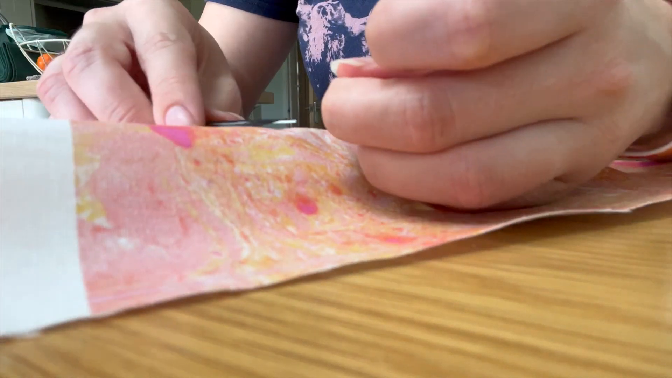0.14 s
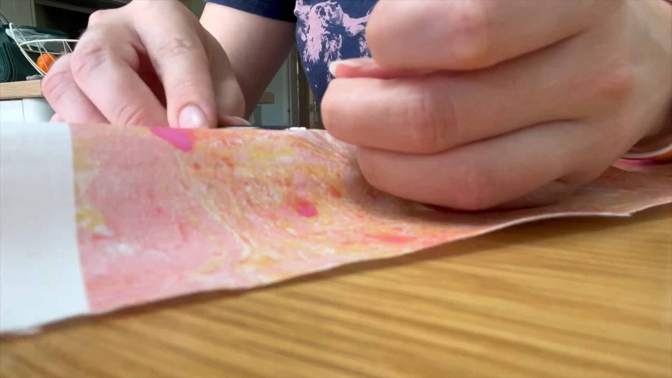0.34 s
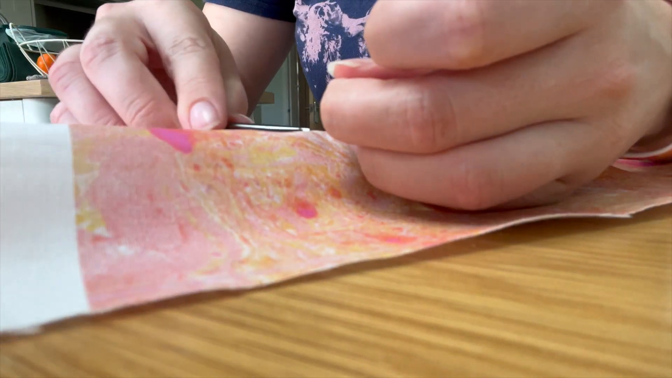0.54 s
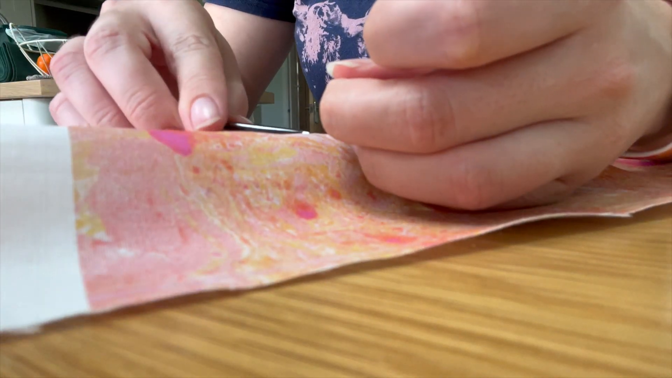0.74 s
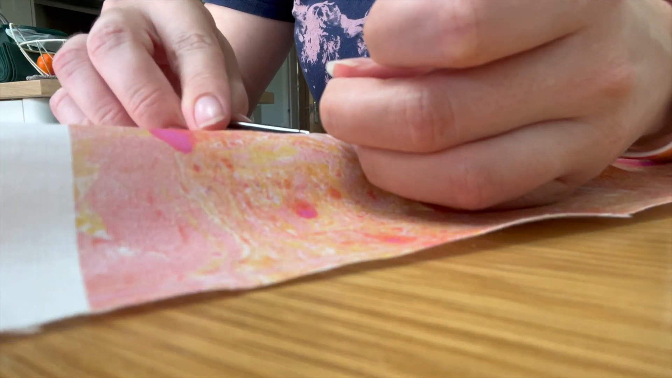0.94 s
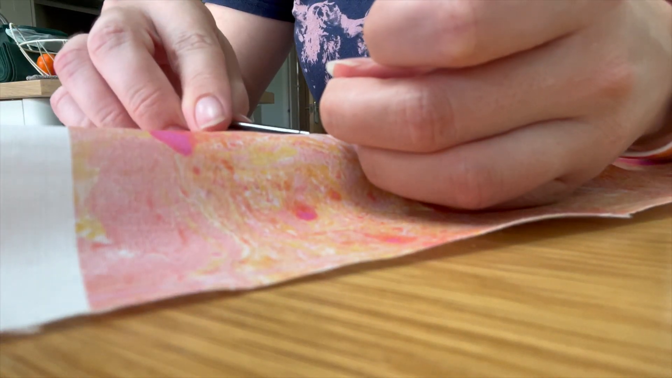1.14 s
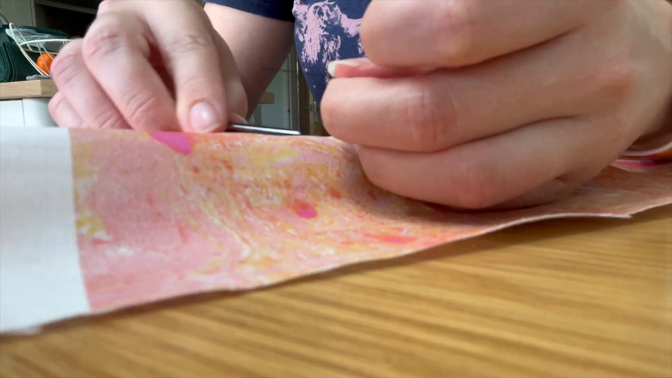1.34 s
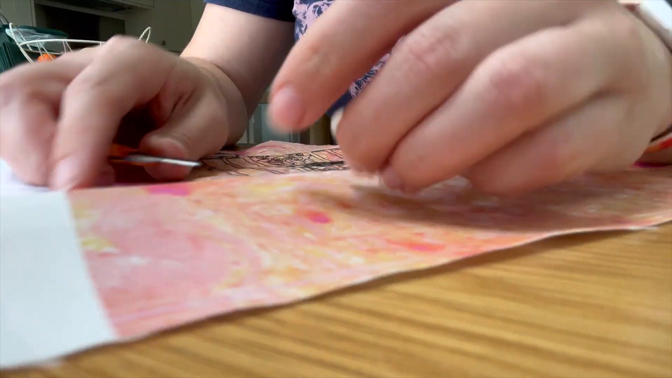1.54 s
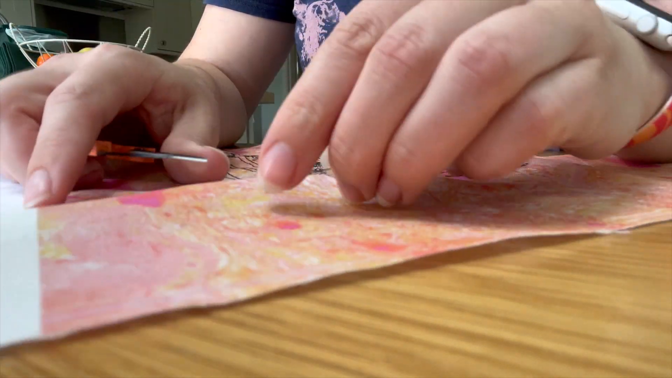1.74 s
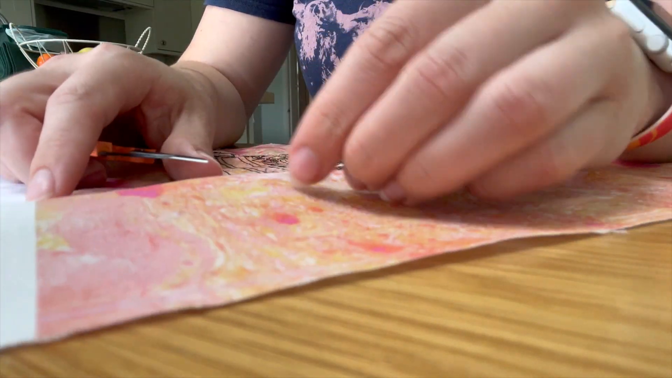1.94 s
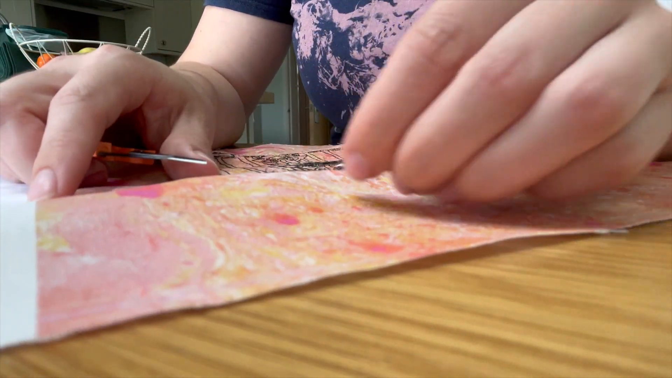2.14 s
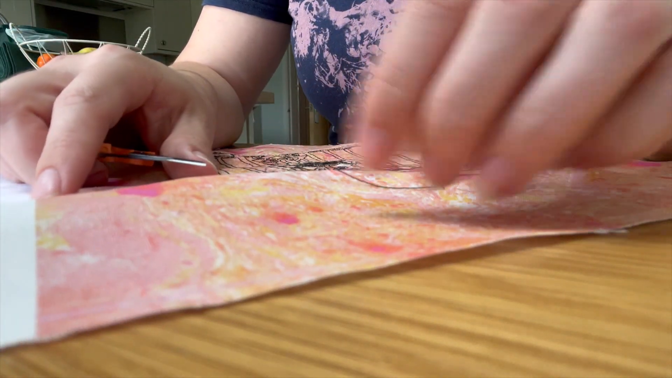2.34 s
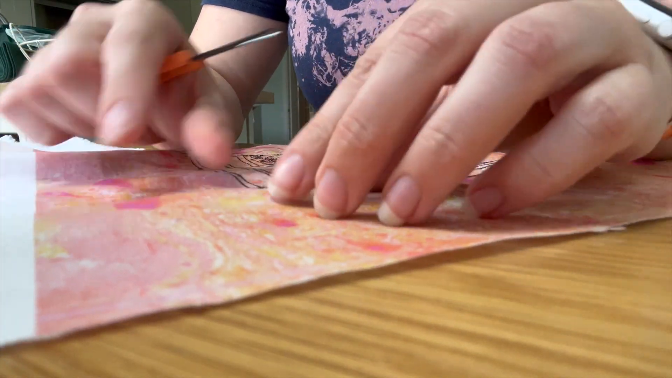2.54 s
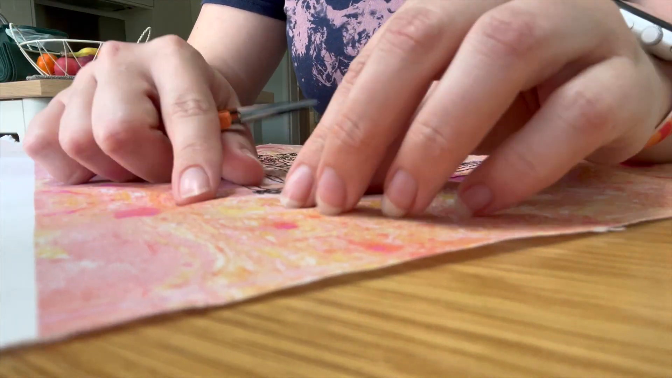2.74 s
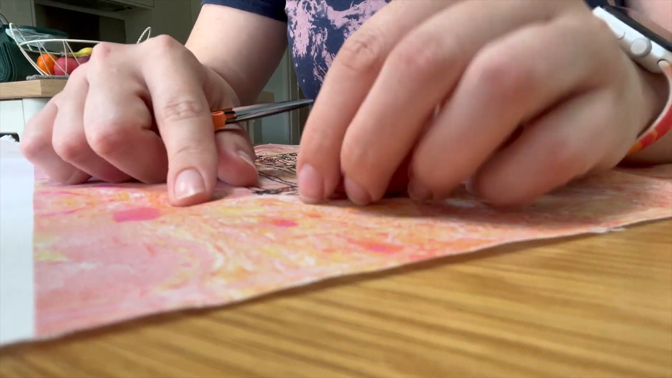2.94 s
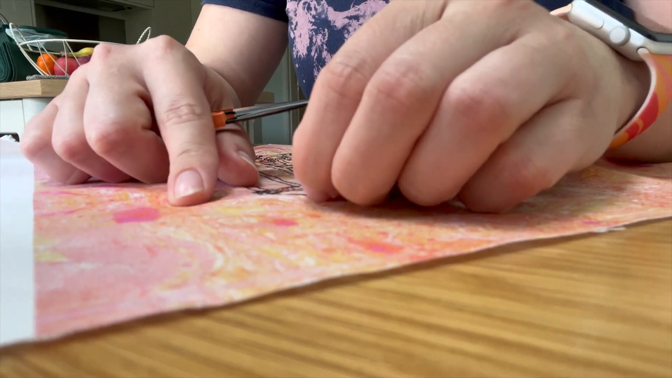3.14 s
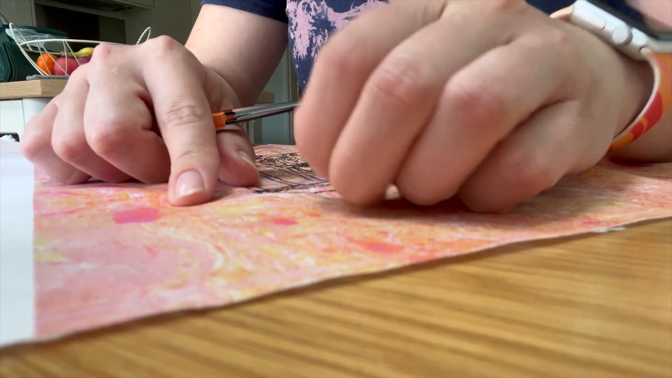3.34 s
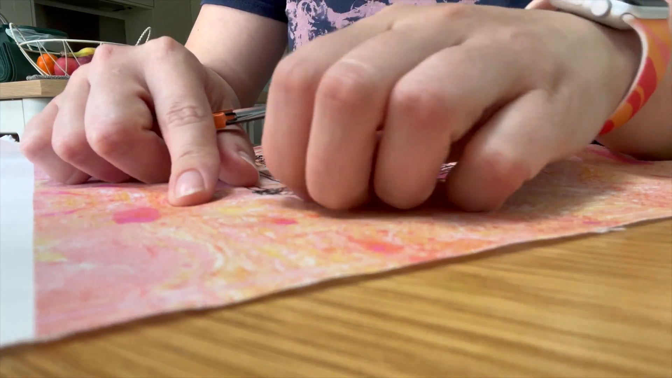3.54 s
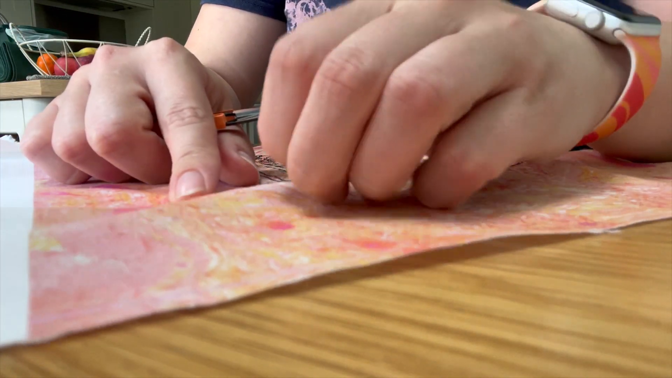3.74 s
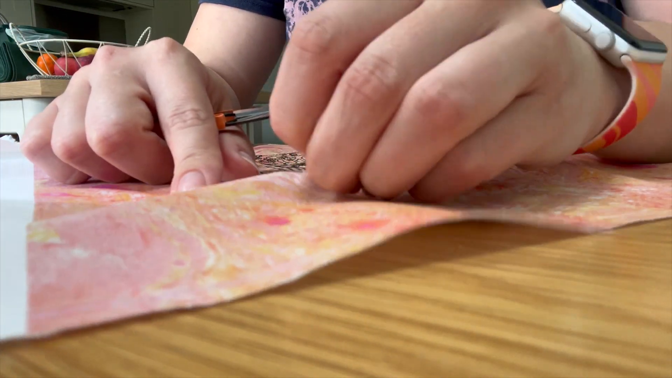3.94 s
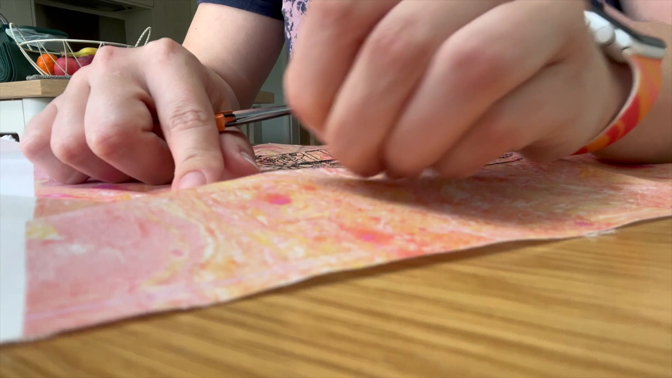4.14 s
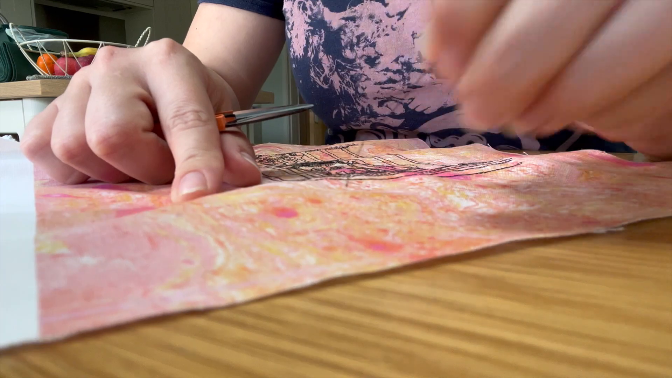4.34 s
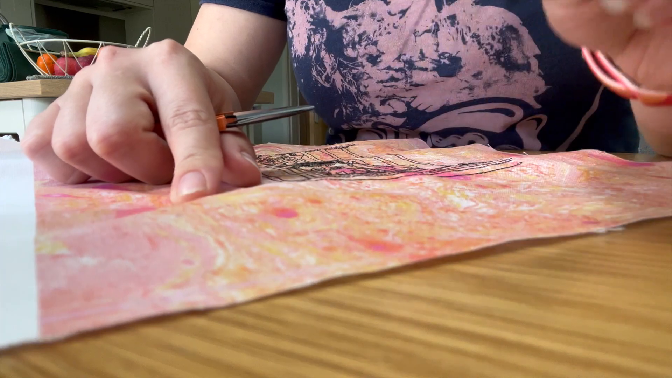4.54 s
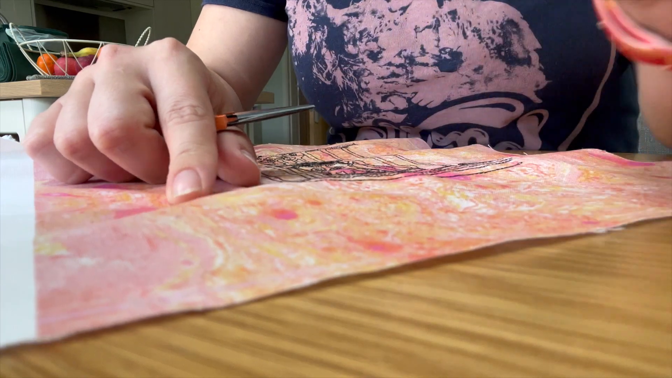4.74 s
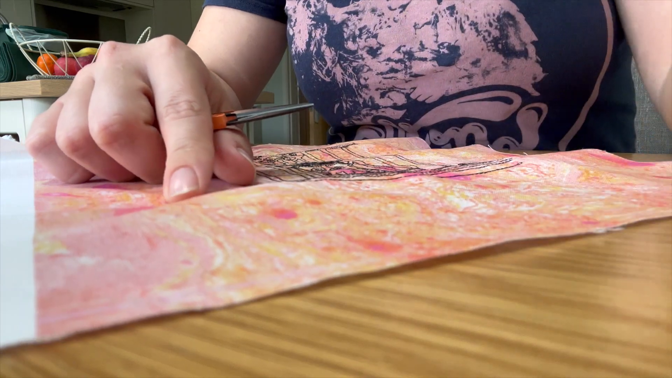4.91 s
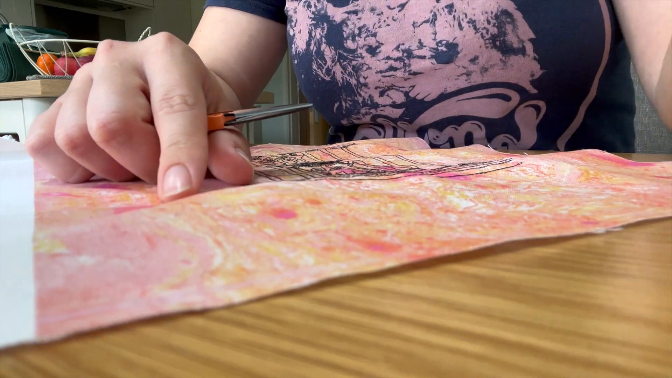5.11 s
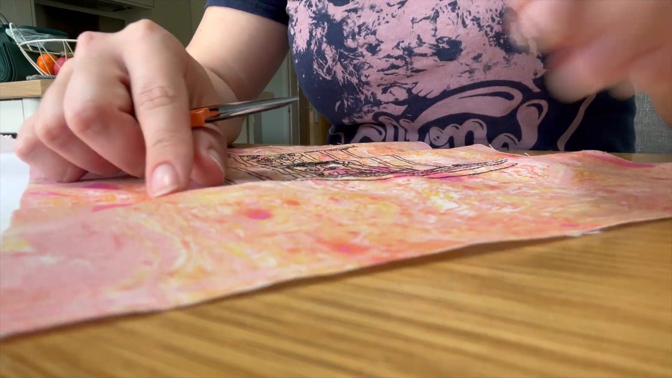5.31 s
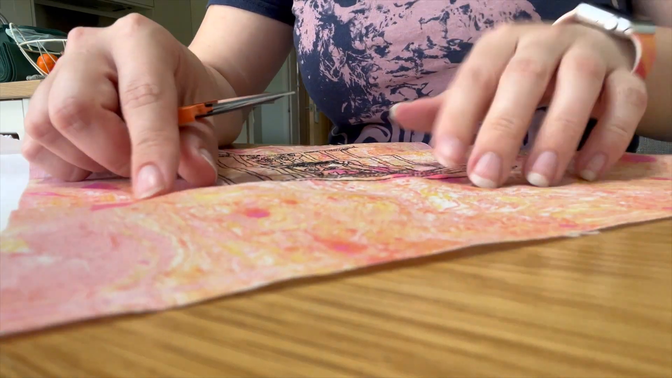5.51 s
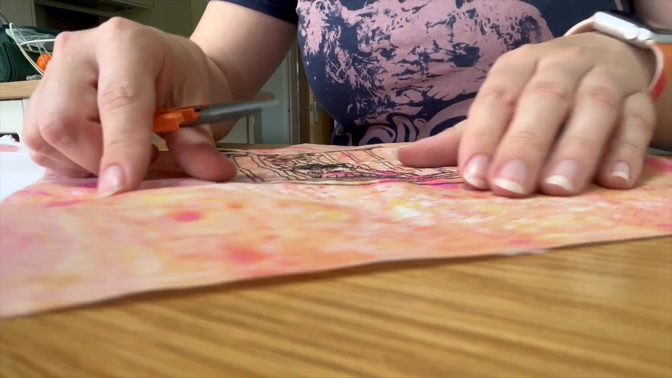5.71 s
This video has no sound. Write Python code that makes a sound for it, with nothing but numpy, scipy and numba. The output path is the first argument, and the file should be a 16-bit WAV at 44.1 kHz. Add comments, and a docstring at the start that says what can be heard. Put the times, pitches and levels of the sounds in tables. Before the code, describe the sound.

Very close to the microphone on a wooden table, small scissors tick faintly, then snip a thread crisply. Hands shuffle and rub stiff fabric, the scissors clack, and a hollow knock sounds on the table. Light nail rasps follow, the cloth flaps back with crackling creases, then a pause and a soft smoothing swish. Quiet small room with low rumble.

```python
"""At a wooden table in a quiet room, small scissors snip a thread on stitched fabric close to a phone.
Blades click as damped noise bursts, rasp as band-passed noise, and flex or sing as sine tones.
Hands brush, drag, scuff and zip over the cloth in crowds of tiny slips, and bump the table's ringing modes.
The stiff fabric lifts and flaps back in falling chirps, cracks and creases; rumble, hiss and hum lie underneath."""
import sys
import numpy as np
from scipy import signal
from scipy.fft import rfft, irfft, next_fast_len
from scipy.io import wavfile
from scipy.ndimage import uniform_filter1d
from numba import njit

SR = 44100
rng = np.random.default_rng(int(sys.argv[2]) if len(sys.argv) > 2 else 0)


def materialize(psi):
    """Save the field psi as 16-bit PCM at rate SR to the path in sys.argv[1].

    A 1-D psi becomes a single channel; in a 2-D psi each row is a channel.
    """
    bounded = np.clip(np.atleast_2d(psi).T, -1, 1)
    quanta = np.round(bounded * 32767).astype(np.int16)
    wavfile.write(sys.argv[1], SR, quanta)


N = 254456
T = np.arange(N) / SR  # s
AGE = T[:SR // 2]  # time since a contact, s
TOP_HZ = 16300  # upper limit of the sound
OPPOSED = np.array([[1], [-1]])  # sound from the sides pushes one port as it pulls the other
SIZE = next_fast_len(N + SR // 2)  # FFT length, samples
LOG_HZ = np.log(np.arange(SIZE // 2 + 1) * SR / SIZE + 1)


def scissors():
    """Clicks are damped at once by the fingers; a cut flexes the blade; sliding edges rasp and briefly sing."""
    # steel touching steel, fingernail or table: start_s, peak_db, centre_hz, t60_s, left_minus_right_db
    clicks = [(.031, -44, 6140, 0.017, -10), (.496, -54, 5600, 0.073, 3.5), (.607, -56, 6050, .007, 4),
              (.626, -52, 6240, 0.017, 2), (.645, -55.5, 6000, 0.034, 4), (0.9234, -56, 5000, 0.032, 3),
              (1.2298, -49, 1070, 0.011, -5), (1.2361, -39.5, 1960, 0.0089, 2),
              (1.2354, -32.5, 8350, 0.0089, -8), (1.454, -28.5, 4600, 0.004, 4.5),
              (1.46, -41, 4230, 0.041, 6), (1.697, -42, 1880, 0.022, 10), (2.139, -52.5, 1990, 0.032, -1),
              (2.161, -46.5, 2960, 0.014, 5), (2.4954, -33.5, 2270, 0.0089, 3),
              (2.536, -40.5, 1480, 0.021, -2), (2.559, -34.5, 2000, 0.015, -9),
              (2.5630, -29, 2170, .008, -2), (2.5631, -28.5, 5330, 0.01, -5),
              (2.5755, -32, 1690, 0.011, -6), (2.7003, -40, 1750, 0.014, 3),
              (2.8773, -29.5, 7300, 0.013, 0.5), (4.653, -60, 2380, .03, 6)]
    # a blade bending as it cuts through the thread: start_s, peak_db, pitch_hz
    cuts = [(1.2361, -37.5, 1730), (2.564, -48, 1950), (2.5749, -36, 1620)]
    # one blade sliding along the other: start_s, level_db, length_s, ring_db, rasp_hz, left_minus_right_db
    scrapes = [(1.226, -42.5, 0.0076, -14, 10000, -5), (1.38, -51.5, 0.021, -5, 10100, -2),
               (2.503, -49.5, 0.0057, 14, 8600, 2), (2.549, -54, 0.014, -8, 6960, -9)]
    blade_hz, blade_t60_s, flex_t60_s = 6590, 0.027, 0.011
    out = np.zeros((2, N))
    for start_s, db, hz, t60_s, pan_db in clicks:
        width_hz = 0.92 * hz
        contact = rng.standard_normal(len(AGE)) * fade(t60_s)
        contact[0] += 4  # extra weight on the first touch
        narrow = resonate(contact, hz, width_hz)
        click = resonate(narrow, hz, min(5.1 * width_hz, TOP_HZ))
        add(out, start_s, undb(db) * click / np.abs(click).max() * place(pan_db))
    for start_s, db, hz in cuts:
        flex = np.sin(2 * np.pi * hz * AGE) * fade(flex_t60_s)
        add(out, start_s, undb(db) * flex)
    for start_s, db, length_s, ring_db, hz, pan_db in scrapes:
        stroke = np.sin(np.pi * np.minimum(AGE / length_s, 1))
        rasp = unit(resonate(rng.standard_normal(len(AGE)), hz, width_hz=2700))
        # the blade sings with the stroke, over a faint dying tail
        ring = np.sin(2 * np.pi * blade_hz * AGE) * (stroke + undb(-41) * fade(blade_t60_s))
        add(out, start_s, undb(db) * (stroke * rasp + undb(ring_db) * ring) * place(pan_db))
    return out


def zips():
    """A nail or blade tip skates over thread after thread, so its speed gives the rasp a rough pitch."""
    # start_s, level_db, length_s, pitch_hz, width as a share of the pitch, left_minus_right_db
    zip_strokes = [(0.354, -83, 0.1, 4700, 0.17, -9), (0.356, -81, 0.084, 1620, .08, 0),
                   (0.388, -77, 0.037, 880, 0.22, -5), (2.581, -57, 0.014, 2240, 0.31, 8),
                   (3.729, -57.5, 0.047, 4460, 0.17, -7), (3.785, -58.5, 0.055, 4120, 0.19, -4),
                   (3.866, -58, 0.036, 4400, .3, -7)]
    out = np.zeros((2, N))
    speed = undb(-1.1 * walk(rate=46))[:len(AGE)]  # relative, uneven
    for start_s, db, length_s, hz, width, pan_db in zip_strokes:
        pitch_hz = hz * speed
        rasp = sweep(rng.standard_normal(len(AGE)), pitch_hz, width)
        rasp = sweep(rasp, pitch_hz, 2 * width)
        stroke = np.sin(np.pi * np.minimum(AGE / length_s, 1))
        add(out, start_s, undb(db) * unit(rasp) * stroke * place(pan_db))
    return out


def brushing():
    """Fibres catch and slip under the fingers, sparser stitches snag, and the hiss wanders in colour."""
    # fingers over cloth: start_s, speeding_up_s, steady_s, relative level_db, hiss_hz, left_minus_right_db
    brush_strokes = [(0.025, 0.0049, 0.022, -53, 5570, 0), (0.059, .015, 0.04, -65.5, 3600, 0.5),
                     (.25, 0.018, .011, -71.5, 4940, -1.5), (.36, 0.045, 0.029, -74, 4600, 0.5),
                     (.6, 0.018, .015, -81.5, 5200, -5), (.7, 0.031, 0.11, -85.5, 5000, -1),
                     (1.17, 0.022, 0.0044, -77, 4350, -4.5), (1.224, 0.011, 0.0048, -68.5, 5500, -1),
                     (1.361, 0.031, 0.033, -63.5, 6400, -3), (1.423, 0.015, 0.017, -56.5, 5170, 0.5),
                     (1.491, 0.069, 0.1, -63, 6100, -1), (1.701, 0.028, 0.18, -78.5, 3950, -2.5),
                     (1.929, 0.04, 0.17, -72, 4900, 0), (2.372, 0.13, 0.018, -68, 5960, 3),
                     (2.439, 0.045, 0.016, -58.5, 6360, 3.5), (2.545, 0.009, 0.031, -65, 6200, -1),
                     (2.66, 0.027, 0.067, -63.5, 5600, -1.5), (2.8, 0.079, 0.05, -70, 5900, 0),
                     (2.959, 0.05, 0.02, -67, 6600, 0), (3.1, .03, 0.089, -77.5, 6400, 1),
                     (3.31, 0.037, 0.021, -77, 5900, -1), (3.474, 0.076, 0.018, -65, 7100, 0),
                     (3.629, 0.063, 0.059, -59, 6170, -1), (3.714, 0.036, 0.034, -55.5, 4800, 0),
                     (3.862, 0.013, 0.0051, -60, 4970, 0), (4.61, 0.073, 0.28, -75, 6950, -0.5),
                     (5.114, 0.064, 0.071, -66.5, 6100, -1.5), (5.24, 0.04, 0.097, -69, 6840, 0),
                     (5.474, 0.056, 0.04, -66, 5860, 0), (5.55, 0.096, .2, -57.5, 7500, -1)]
    # spectrum set for the front share of the brushing hiss: pitch_hz, relative level_db per Hz
    brush_colour = [(300, -17), (800, -0.5), (1200, -1.5), (1700, -1), (2200, -1.5), (2650, -1.5),
                    (3200, -1), (4000, -1.5), (6500, 2), (8500, 6), (10500, -26), (12500, -9), (15500, -5)]
    start_s, rise_s, steady_s, db, hz, pan_db = np.transpose(brush_strokes)
    speed = strokes(zip(start_s, rise_s, steady_s, db, pan_db), t60_s=0.36)
    speed = speed * undb(1.5 * walk(rate=30))  # never quite even
    fibres = grains(rate=9000, spread_db=-1.0) * undb(0.82 * walk(rate=69))
    snags = undb(-7) * grains(rate=260, spread_db=-0.5)
    slips = colour(fibres + snags, brush_colour)
    centre_hz = np.interp(T, start_s + rise_s, hz) * undb(0.48 * walk(rate=32))
    hiss = sweep(slips, np.clip(centre_hz, 1, TOP_HZ), 0.85)
    return unit(slips + undb(-0.5) * hiss) * speed * undb(2.5)


def dragging():
    """Pressure sends a dull rub through the table; the weave adds a scratch that sings in the table top."""
    # a hand or forearm dragging the cloth:
    # start_s, pressing_down_s, steady_s, relative level_db, scratch_db, left_minus_right_db
    drag_strokes = [(0.025, 0.0085, 0.039, -62.5, 10, 3), (1.419, 0.035, 0.03, -56, 1.5, -1.5),
                    (1.5, 0.032, 0.058, -53, -2, 1), (1.65, 0.0083, 0.21, -60, 3, -0.5),
                    (1.87, 0.055, 0.34, -63, 1.5, -0.5), (2.447, 0.017, 0.019, -51.5, -4, -1.5),
                    (2.53, 0.019, 0.091, -62, 8.5, 2.5), (2.689, 0.0018, 0.0049, -42.5, -3.5, 3.5),
                    (2.75, 0.02, 0.088, -55, -2, 3), (2.875, 0.0064, 0.056, -52.5, -6, 1.5),
                    (3, 0.0033, 0.038, -52.5, -5.5, 0), (3.061, 0.024, 0.048, -63, -17, 4),
                    (3.15, 0.045, 0.48, -73.5, -10, 7), (3.539, 0.013, 0.025, -60, -3, 0),
                    (3.699, 0.044, 0.049, -59.5, -18, 1.5), (4.629, 0.023, 0.49, -66, -3.5, 0.5),
                    (5.51, 0.011, 0.021, -55.5, 3.5, 4), (5.57, 0.059, .16, -58.5, 6.5, 1.5)]
    # spectrum of the rub: pitch_hz, relative level_db
    rub_colour = [(40, -2), (90, 4), (200, 3), (300, 1.5), (430, 3), (650, -9), (900, -16), (1300, -21),
                  (2200, -20), (2700, -23), (3300, -32.5), (5000, -55)]
    # resonances of the table top under a rubbing hand: pitch_hz, width_hz, level_db
    rub_modes = [(1125, 230, -3.5), (1714, 140, 1), (3050, 400, -6.5)]
    scratch_hz = 606  # above this the rub of the weave is heard as a scratch
    start_s, rise_s, steady_s, db, scratch_db, pan_db = np.transpose(drag_strokes)
    rub = colour(grains(rate=3000, spread_db=-0.5), rub_colour)
    dull = signal.lfilter(*signal.butter(3, scratch_hz, "low", fs=SR), rub)
    scratch = signal.lfilter(*signal.butter(3, scratch_hz, "high", fs=SR), rub)
    singing = sum(undb(mode_db) * resonate(scratch, hz, width_hz) for hz, width_hz, mode_db in rub_modes)
    weight = strokes(zip(start_s, rise_s, steady_s, db, pan_db), t60_s=0.39)
    grit = strokes(zip(start_s, rise_s, steady_s, db + scratch_db, pan_db), t60_s=0.39)
    dull = dull * weight * undb(1.5 * walk(rate=28))
    scratch = (scratch + singing) * grit * undb(0.8 * walk(rate=70))
    return undb(0.5) * (dull + scratch)


def scuffs():
    """Knuckles and scissor handles grate over raised stitches: short, uneven runs of dry ticks that die away."""
    # start_s, pressing_down_s, steady_s, level_db, left_minus_right_db
    scuff_strokes = [(.034, 0.0045, 0.075, -67.5, -3), (1.445, .008, 0.018, -63, -4),
                     (1.515, .03, 0.035, -63.5, 0), (1.605, 0.0069, 0.011, -63, -1),
                     (2.69, .004, 0.011, -54, -2), (2.715, .006, .025, -59.5, 2),
                     (2.792, .002, .004, -60, 1), (2.822, .002, .02, -57.5, 2),
                     (2.885, 0.0087, 0.022, -62, 3), (3.007, .004, 0.011, -61.5, -1),
                     (4.651, 0.0028, 0.0085, -63.5, 4)]
    # spectrum of the ticks: pitch_hz, relative level_db
    scuff_colour = [(200, -14), (550, 5.5), (1100, 1), (1700, -9.5), (2400, -15), (4000, -19.5),
                    (8000, -39)]
    ticks = colour(grains(rate=380, spread_db=2.0), scuff_colour)
    return ticks * strokes(scuff_strokes, t60_s=0.096)


def fabric():
    """Each buckle cracks and sends a chirp through the sheet; small creases follow in a crowd."""
    # the stiff fabric buckles: start_s, level_db, crack_db, first_hz
    buckles = [(1.6972, -49, -12, 2390), (1.793, -55, -15, 1870), (2.691, -42, -17, 950),
               (2.792, -52.5, -11, 1570), (2.821, -49, -15, 1690), (2.865, -49.5, -17, 1200),
               (2.879, -48, -8, 1440), (3.006, -50.5, -16, 915), (3.554, -57.5, -17, 1140),
               (3.929, -46.5, -16, 1910), (4.041, -48, -2, 1210), (4.055, -49, -2, 1200),
               (4.062, -36.5, 2, 1160), (4.0756, -48, 4, 710), (4.084, -48, -2, 690),
               (4.0982, -35.5, 1.5, 1030), (4.107, -46, 5, 1200), (4.1104, -36, -12, 850),
               (4.133, -43, -19, 1480), (4.1424, -44, 4, 1060), (4.155, -41.5, -14, 1525),
               (4.1702, -46, -8, 990), (4.185, -53, -7, 1430), (4.192, -52, 3, 890), (4.211, -51, 6, 1150),
               (4.236, -54, 5, 980)]
    out = np.zeros((2, N))
    for start_s, db, crack_db, first_hz in buckles:
        flap = bending_wave(first_hz, last_hz=187, glide_s=0.00238) * fade(t60_s=0.054)
        burst = unit(resonate(rng.standard_normal(len(AGE)), hz=2900, width_hz=8200))
        crack = burst * fade(t60_s=0.0078)
        add(out, start_s, undb(db) * (flap + undb(crack_db) * crack))
    return (out + creases()) * place(pan_db=0.3)


def creases():
    """A dense crowd of tiny folds giving way, with a few larger ones that each send out a short chirp."""
    # the fabric crumples as it drops back: time_s, level_db
    crumple = [(4.02, -73), (4.048, -54.5), (4.068, -54.5), (4.092, -73), (4.108, -45), (4.15, -43),
               (4.19, -45.5), (4.232, -55.5), (4.255, -66), (4.3, -78)]
    # spectrum set for the front share of the crumpling: pitch_hz, relative level_db
    crumple_colour = [(50, -8), (120, 3.5), (210, 6.5), (400, -4.5), (700, -7.5), (1050, -9), (1400, -9.5),
                      (2000, -10.5), (2450, -4.5), (2900, -9), (3350, -7.5), (4200, -10), (5200, -8),
                      (8500, -2.5), (11000, -36.5), (16000, -21)]
    tiny = colour(grains(rate=2400, spread_db=1) * undb(2.2 * walk(rate=160)), crumple_colour)
    chirp = bending_wave(first_hz=1010, last_hz=194, glide_s=0.00224) * fade(t60_s=0.025)
    folds = np.sign(grains(rate=130, spread_db=0))
    larger = unit(signal.fftconvolve(folds, chirp)[:N])
    level_db = np.interp(T, *np.transpose(crumple), left=-200, right=-200)
    return (tiny + undb(-8) * larger) * undb(level_db)


def table():
    """A soft blow spreads through the table top, rings its modes in a fresh mix and rocks it from side to side."""
    # hands bumping the table: start_s, level_db, first_hz, swell_s, ring_db, rocking_db
    bumps = [(0.032, -56.5, 157, 0.021, 10, -8), (.35, -64, 111, 0.058, 4, -15),
             (0.505, -58, 93, 0.028, -6, -15), (1.228, -48, 249, 0.031, -3.5, -7),
             (1.386, -46.5, 91, 0.023, -2, -6), (1.434, -45, 252, 0.0081, -7, -9),
             (1.505, -45.5, 284, 0.052, -0.5, -14), (2.461, -41, 420, 0.036, -4, 1),
             (2.546, -43.5, 88, 0.021, -8, -17), (2.591, -49, 129, .025, -13, -15),
             (2.691, -26.5, 458, 0.031, -2.5, -5), (2.767, -42, 140, 0.037, -9, -14),
             (3.006, -40.5, 439, 0.036, -4, 0), (4.058, -42, 149, 0.0094, -6, -15),
             (4.084, -38.5, 268, 0.027, -4.5, -2), (4.149, -48.5, 130, 0.051, 14.5, -7),
             (5.519, -43.5, 159, 0.031, -8, -16), (5.622, -57, 79, 0.052, -6, -14)]
    # ringing modes of the table: pitch_hz, level_db, t60_s
    table_modes = [(70.6, -2, 0.073), (207, 4, 0.14), (233, -3, .12), (336, -4, 0.096), (375, -4, .14),
                   (459.8, 4, 0.14), (563, -11, 0.14), (663, -16, 0.08), (817, -11, 0.08)]
    rock_hz, rock_t60_s = 136, 0.34
    top, rocking = np.zeros((2, N)), np.zeros((2, N))
    hz, mode_db, t60_s = np.transpose(table_modes)[:, :, None]
    for start_s, db, first_hz, swell_s, ring_db, rock_db in bumps:
        detune, scatter = rng.standard_normal((2, len(hz), 1))
        softness = np.hypot(1, (hz / first_hz) ** 2)  # a soft hand misses the high modes
        gain = undb(mode_db + 1.5 * scatter) / softness
        tones = np.sin(2 * np.pi * hz * (1 + 0.012 * detune) * AGE)
        modes = np.sum(gain * tones * fade(t60_s), axis=0)
        ring = modes * (1 - np.exp(-(AGE / 0.0093) ** 2))
        # flesh presses and lets go smoothly
        push = (AGE / swell_s * np.exp(1 - AGE / swell_s)) ** 3.84
        thud = push * bending_wave(first_hz, last_hz=61.0, glide_s=0.00976)
        add(top, start_s, undb(db) * (thud + undb(ring_db) * ring))
        sway = np.sin(2 * np.pi * rock_hz * AGE) * fade(rock_t60_s) * (1 - np.exp(-AGE / 0.0058))
        add(rocking, start_s + swell_s / 2, undb(db + rock_db) * sway)
    return top, rocking


def reflections(x, t60_s, db, top_hz):
    """Diffuse echoes, duller and thinner than the direct sound: one row from the front, one from the sides."""
    tail = rng.standard_normal((2, len(AGE))) * fade(t60_s) * (1 - np.exp(-AGE / 0.0034))
    tail = tail / np.sqrt(np.sum(tail ** 2))
    # waves longer than those at 122 Hz are hardly scattered
    band = signal.butter(2, [122, min(top_hz, TOP_HZ)], "band", fs=SR)
    tail = signal.lfilter(*band, tail)
    return undb(db) * signal.fftconvolve(x.mean(axis=0)[None], tail, axes=1)[:, :N]


def room():
    """Low rumble, faint hiss and a wavering hum: one row from the front, one from the sides."""
    # spectrum set for the background rumble and hiss: pitch_hz, relative level_db per Hz
    background_colour = [(20, -8.5), (55, 1.5), (100, -3.5), (190, -6.5), (262, -17), (700, -24),
                         (1300, -34), (4000, -39.5), (8000, -36.5), (11000, -53.5), (14000, -38)]
    # hum whose phase wanders: pitch_hz, level_db
    hum_tones = [(49, -71.5), (177.6, -75)]

    def air():
        """Shaped noise whose level wavers slowly."""
        return colour(rng.standard_normal(N), background_colour) * undb(-65.5 + 1.2 * walk(rate=9.7))

    front, side = air(), air()
    hum = sum(undb(db) * unit(np.sin(2 * np.pi * hz * T + 0.97 * walk(rate=5.1))) for hz, db in hum_tones)
    # long waves are alike at both ports
    side = signal.lfilter(*signal.butter(1, 160, "high", fs=SR), side)
    return np.array([front + hum, undb(-5.5) * side])


def ports(x):
    """Sound from the front reaches the two microphone ports at unequal level and phase."""
    # pitch_hz, left_minus_right_db, left_lead_rad
    port_balance = [(29.2, -8.5, 2.5), (69, -1.5, -0.42), (132.4, -5, -1.2), (296, -6, -0.06),
                    (503, -5.5, -1.63), (826, -4.5, -1.72), (1040, -4, -1.02), (1750, -2.5, -1.1),
                    (2840, -1.5, -1.8), (3680, -7.5, 1.51), (5430, -7, 1.54), (8700, 5, 2), (11130, 2, 3.5),
                    (15200, 2.5, 0.7)]
    half = undb(over_hz(port_balance) / 2) * np.exp(1j * over_hz(port_balance, column=2) / 2)
    return irfft(rfft(x, SIZE) * np.array([half, 1 / half]), SIZE)[:, :N]


def strokes(rows, t60_s):
    """Level of hand movements: each gathers speed, holds and coasts to rest."""
    power, age = np.zeros((2, N)), T[:SR]
    for start_s, rise_s, steady_s, db, pan_db in rows:
        rise = np.sin(np.pi / 2 * np.clip(age / rise_s, 0, 1)) ** 2
        coast = np.exp(-np.log(1000) * np.maximum(age - rise_s - steady_s, 0) / t60_s)
        add(power, start_s, (undb(db) * rise * coast * place(pan_db)) ** 2)
    return np.sqrt(power)


def grains(rate, spread_db):
    """Tiny slips at random moments (rate per second), of unequal size, at rms 1."""
    hits = (rng.random(N) < rate / SR) * rng.standard_normal(N)
    size = undb(spread_db * np.clip(rng.standard_normal(N), -2, 2))
    return unit(hits * size)


def bending_wave(first_hz, last_hz, glide_s):
    """In a sheet high notes travel fastest, so a blow arrives as a falling chirp."""
    hz = last_hz + (first_hz - last_hz) * np.exp(-AGE / glide_s)
    return np.sin(2 * np.pi * np.cumsum(hz) / SR)


def walk(rate):
    """Smooth random wander at rms 1, with rate new values per second."""
    hold = int(SR / rate)
    steps = np.repeat(rng.standard_normal(N // hold + 1), hold)[:N]
    return unit(uniform_filter1d(steps, hold))


@njit
def sweep(x, hz, width):
    """Band-pass whose centre moves; width is a share of the centre."""
    y, band, low = np.empty(len(x)), 0., 0.
    for i in range(len(x)):
        g = np.tan(np.pi * hz[i] / SR)
        v = (band + g * (x[i] - low)) / (1 + g * (g + width))
        band, low, y[i] = 2 * v - band, low + 2 * g * v, width * v
    return y


def resonate(x, hz, width_hz):
    """Two-pole resonance."""
    return signal.lfilter(*signal.iirpeak(min(hz, SR / 2 - 1), hz / width_hz, fs=SR), x)


def over_hz(points, column=1):
    """Spread a column of a frequency table over every FFT bin."""
    rows = np.array(points)
    return np.interp(LOG_HZ, np.log(rows[:, 0]), rows[:, column])


def shade(x, points):
    """Filter x by points of pitch_hz and level_db."""
    return irfft(rfft(x, SIZE) * undb(over_hz(points)), SIZE)[..., :N]


def colour(x, points):
    """Shade x and bring it to rms 1."""
    return unit(shade(x, points))


def fade(t60_s):
    """Exponential decay by 60 dB in t60_s."""
    return np.exp(-np.log(1000) * AGE / t60_s)


def place(pan_db):
    """Left and right gains from a left-minus-right level."""
    return undb(OPPOSED * pan_db / 2)


def add(track, start_s, sound):
    """Mix a sound into both channels at its start time."""
    start = max(int(start_s * SR), 0)
    track[:, start:start + sound.shape[-1]] += sound[..., :N - start]


def undb(db):
    """Decibels to gain."""
    return 10 ** (np.asarray(db) / 20)


def unit(x):
    """Scale to rms 1."""
    return x / np.sqrt(np.mean(x ** 2))


def scene():
    """Hands and scissors close by, echoed by the table top and the room."""
    # level of the opposed-channel rustle, strongest near 10.5 kHz: pitch_hz, level_db
    opposed_colour = [(50, -7), (150, -6), (450, -15), (1200, -18), (1950, -5), (2330, 6), (2750, -6),
                      (5000, -27), (8000, -11), (10500, 19), (13000, 6.5), (16000, 4)]
    cloth = brushing() + dragging() + scuffs() + zips()
    flap, steel = fabric(), scissors()
    wood, rocking = table()
    direct = cloth + flap + steel + wood
    near = reflections(undb(-6) * steel + flap + undb(6.0) * wood, t60_s=0.021, db=-3.5, top_hz=8970)
    # the scissors are given less room echo, so they sound dry
    far = reflections(cloth + flap + wood + undb(-4) * steel, t60_s=0.27, db=-6.0, top_hz=6000)
    front, side = near + far + room()
    # a second layer of rustle, opposed between the channels
    opposed_rustle = shade(brushing() + dragging() + undb(2) * creases(), opposed_colour)
    # the fabric lifts on the right, where its low flutter is louder
    flutter = undb(-11.5) * signal.lfilter(*signal.butter(1, 1100, fs=SR), flap)
    return ports(direct + front - OPPOSED * flutter) + OPPOSED * (side + opposed_rustle + rocking)


def record(dry):
    """The phone cuts the top with a steep low-pass."""
    return signal.sosfilt(signal.ellip(8, .2, 70, TOP_HZ, fs=SR, output="sos"), dry)


dry = scene()
out = record(dry)
materialize(out)
```